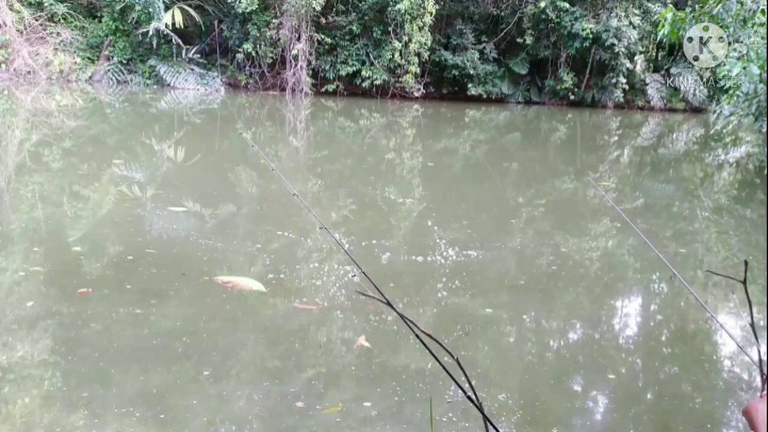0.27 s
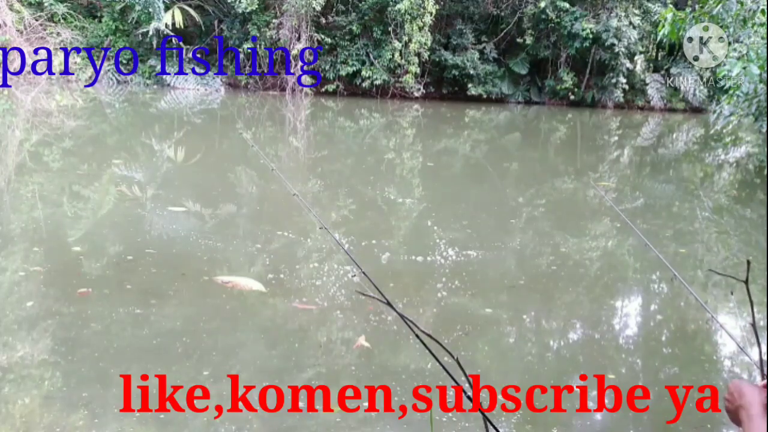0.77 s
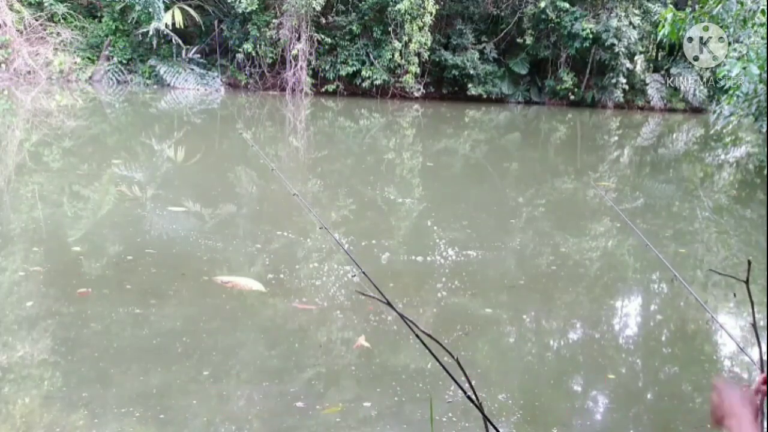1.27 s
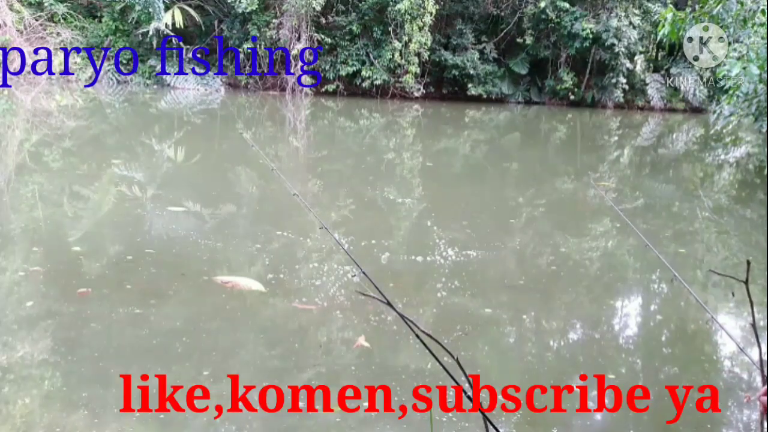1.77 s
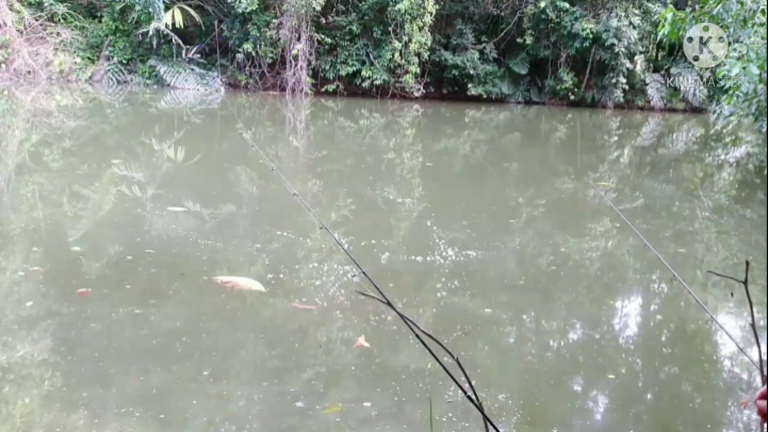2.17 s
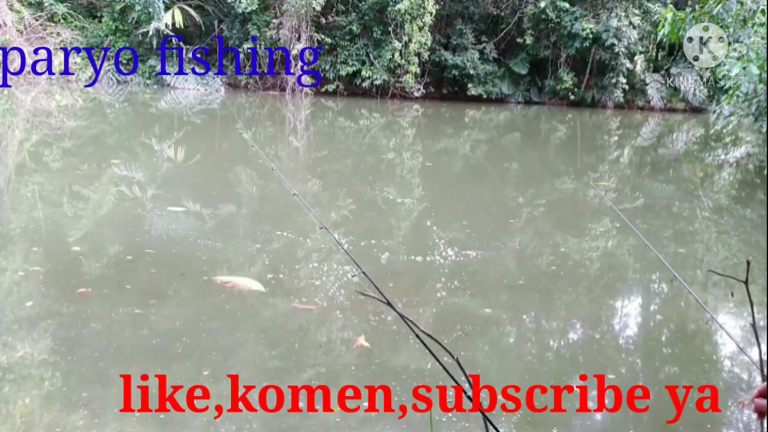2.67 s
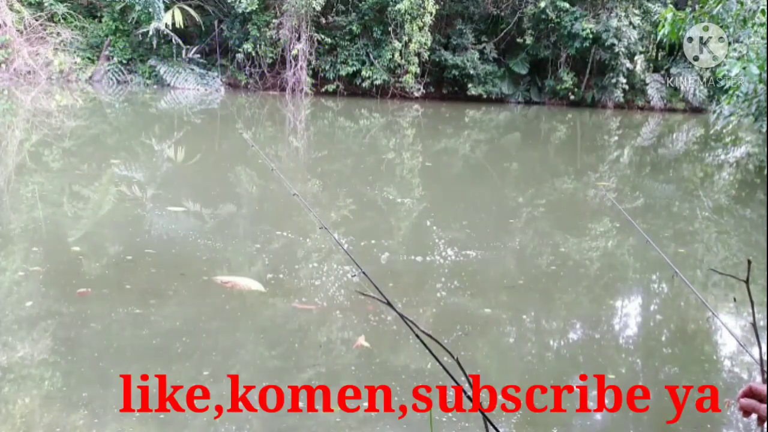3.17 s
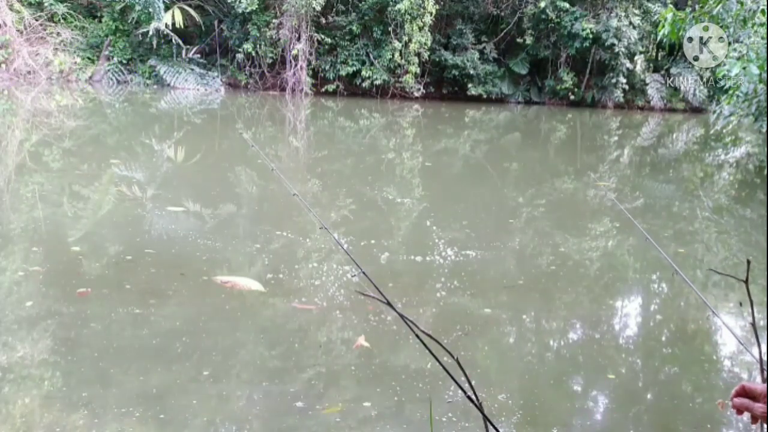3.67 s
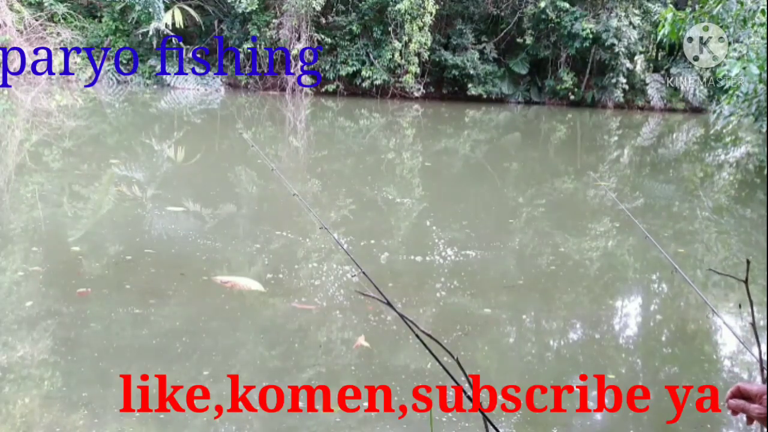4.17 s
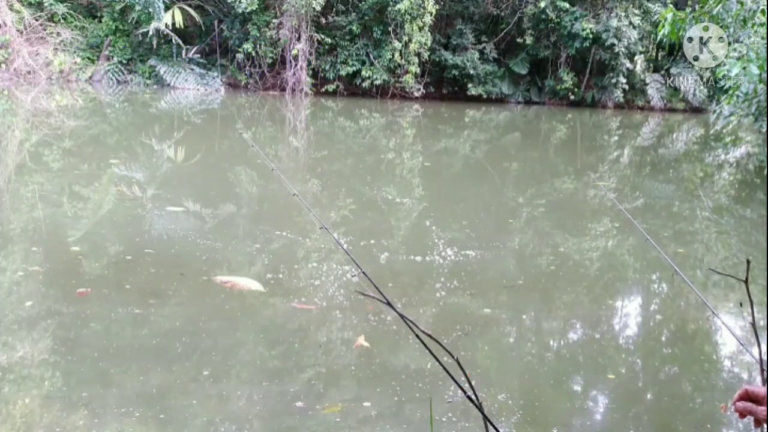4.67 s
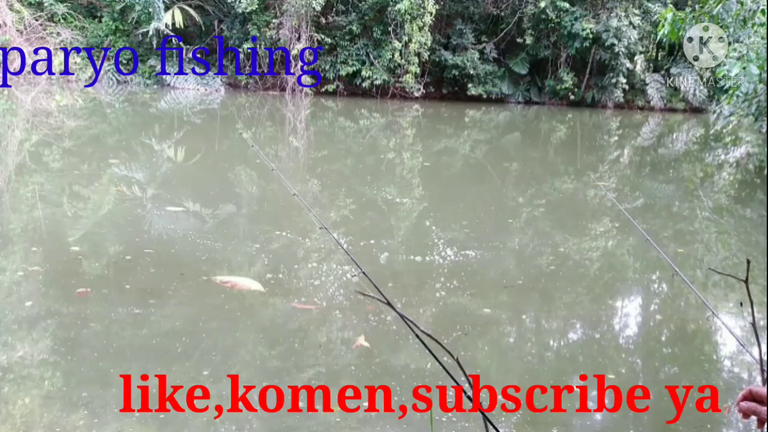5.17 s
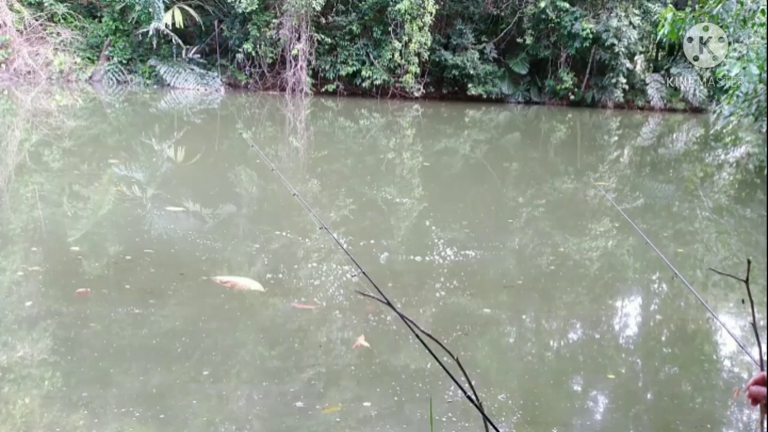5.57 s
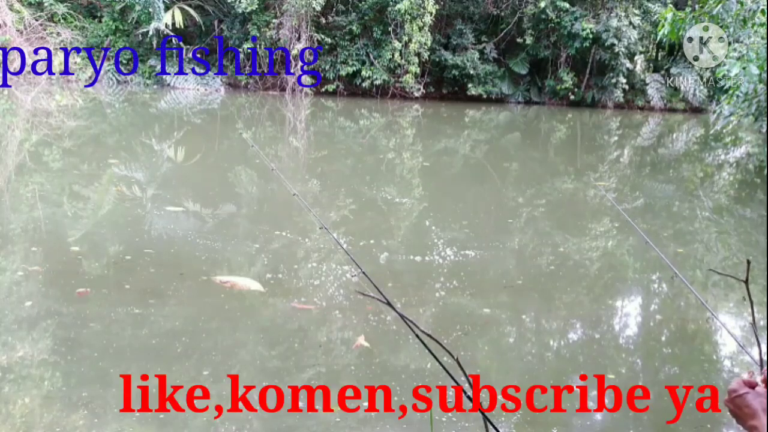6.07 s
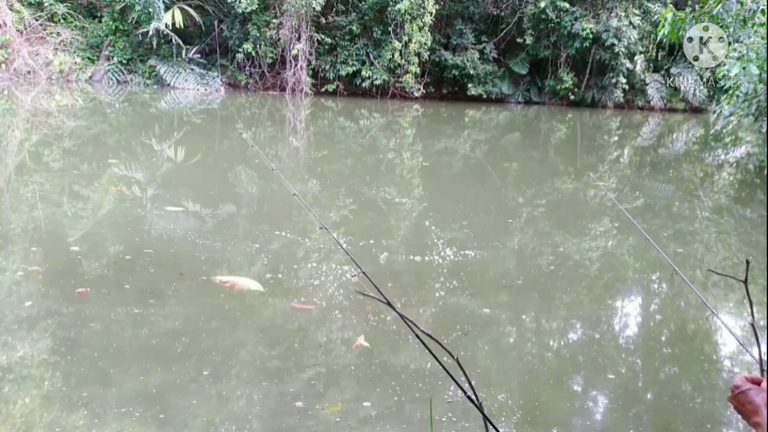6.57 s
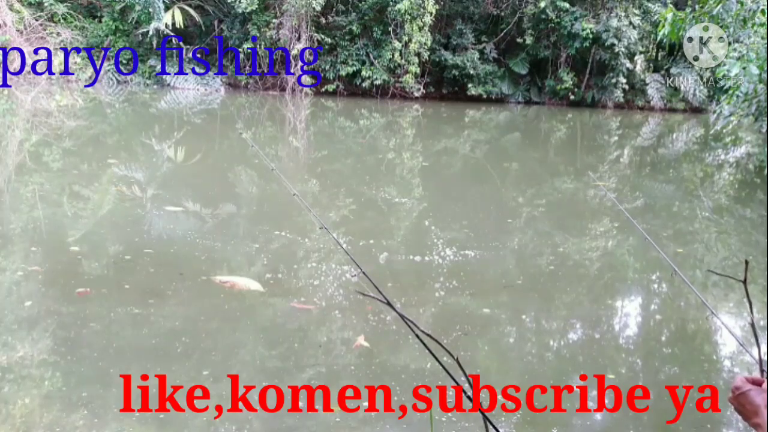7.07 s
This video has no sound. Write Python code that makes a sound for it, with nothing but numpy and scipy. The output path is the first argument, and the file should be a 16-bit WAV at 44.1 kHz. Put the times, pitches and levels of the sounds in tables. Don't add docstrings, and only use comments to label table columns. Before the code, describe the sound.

A steady, shrill cicada buzz, centred very high and spread to both sides, lasts throughout over faint leaf hiss and a distant, barely audible wavering hum. Light wind presses softly on the microphones, lowest in pitch and strongest near 0.9 s. Small cloth rustles open the scene; at 0.78 s a hollow cane is cracked hard in a quick double blow, rattling woodily, with a lighter knock at 0.88 s. At 1.4 s a brisk crisp sweep through grass stands out, then uneven close rustling continues to about 5 s, strongest around 1.6, 2.6, 3.4 and 4.3 s. A soft dull foot thud falls at 4.7 s. A small bird gives brief, rising-and-falling high whistles, faint at 1.4 s, then clearer at 2.4, 2.75, 3.3, 4.6 and 4.75 s, weaker around 5.5 and 6.4 s. The end is calmer, with insects, air and a slight rustle at 7.1 s.

```python
import sys
import numpy as np
from scipy import signal
from scipy.fft import rfft, irfft
from scipy.io import wavfile
from scipy.ndimage import uniform_filter1d

SR = 44100
rng = np.random.default_rng(int(sys.argv[2]) if len(sys.argv) > 2 else 0)


def materialize(psi):
    bounded = np.clip(np.atleast_2d(psi).T, -1, 1)
    quanta = np.round(bounded * 32767).astype(np.int16)
    wavfile.write(sys.argv[1], SR, quanta)


def magnitude_from_level(level_db):
    exponent = np.asarray(level_db, float) / 20
    return 10 ** exponent


N = 321930
TIME = np.arange(N) / SR
HZ = np.maximum(np.fft.rfftfreq(N, 1 / SR), 1)
EARS = np.array([[1], [-1]])


def unit(x):
    return x / np.sqrt(np.mean(x ** 2))


def along(points):
    hz, value = np.transpose(points)
    return np.interp(np.log(HZ), np.log(hz), value)


def contour(points):
    return np.interp(TIME, *np.transpose(points))


def colour(x, gain):
    return irfft(rfft(x) * gain, N)


def ring(x, hz, width_hz):
    return signal.lfilter(*signal.iirpeak(hz, hz / width_hz, fs=SR), x)


def walk(rate):
    k = int(SR / rate)
    held = np.repeat(rng.standard_normal(N // k + 1), k)
    return unit(uniform_filter1d(uniform_filter1d(held, k), k)[:N])


def arrival(lag_s):
    return np.exp(-1j * np.pi * HZ * lag_s * EARS)


def place(x, lag_s, t60, wet_db):
    t = TIME[:SR // 2]
    tail = rng.standard_normal((2, len(t))) * np.exp(-np.log(1000) * t / t60)
    tail *= magnitude_from_level(wet_db) / np.sqrt(np.sum(tail ** 2, axis=1, keepdims=True))
    scatter = signal.fftconvolve(np.atleast_2d(x), tail, axes=1)[:, :N]
    return colour(x, arrival(lag_s)) + scatter


# f/Hz, width/Hz, click rate/Hz, level/dB, left minus right/dB
CHOIRS = [(7110, 42, 190, -69, -10), (7500, 320, 160, -63, 7.5), (8170, 900, 260, -61.5, 9.5),
          (9327, 800, 300, -53.5, -3), (10200, 970, 310, -67.5, -9), (15200, 900, 270, -75, 7)]
# t/s, level/dB
SWELL = [
    (0.0, 0),
    (7.3, -1),
]


def cicadas():
    out, singers = 0, 32
    for hz, width_hz, rate, level_db, pan_db in CHOIRS:
        clicks = np.zeros((2, N))
        chance = rng.standard_normal((2, singers, 3500))
        tempo = rate * (1 + .08 * rng.standard_normal((singers, 1)))
        at = (np.cumsum(1 + .15 * chance[0], axis=1) * SR / tempo).astype(int) - SR // 10
        port = np.arange(singers)[:, None] % 2 + 0 * at
        heard = (at >= 0) & (at < N)
        strength = np.sign(chance[1]) * magnitude_from_level(2 * chance[1])
        np.add.at(clicks, (port[heard], at[heard]), strength[heard])
        buzz = ring(ring(clicks, hz, 1.5 * width_hz), hz, 1.5 * width_hz)
        buzz = buzz * magnitude_from_level(0.6 * walk(6))
        out = out + unit(buzz) * magnitude_from_level(level_db + EARS * pan_db / 2)
    return out * magnitude_from_level(contour(SWELL))


# f/Hz, level/dB per Hz
AIR = [(60, -87.5), (200, -89), (500, -95.5), (1100, -99), (1600, -95), (2400, -89), (3600, -92.5),
       (5500, -96.5), (6700, -95.5), (9000, -94.5), (11000, -99), (12600, -104), (14000, -104),
       (15500, -103)]
# f/Hz, share/0-1
ALIKE = [(60, 0.56), (300, 0.41), (900, 1), (1800, 0.02), (4000, 0.1), (15000, 0)]


def air():
    share = np.clip(along(ALIKE), 0, 1)
    common = rfft(rng.standard_normal(N)) * np.sqrt(share) * arrival(0.00027)
    apart = rfft(rng.standard_normal((2, N))) * np.sqrt(1 - share)
    hiss = (common + apart) * magnitude_from_level(along(AIR)) * np.sqrt(SR / 2)
    step = np.clip(1.5 * np.log2(HZ / 400), 0, 8)
    out = 0
    for k in range(9):
        band = irfft(hiss * np.clip(1 - abs(step - k), 0, 1), N)
        steadiness = 1 - 0.65 * (k > 7)
        out = out + band * magnitude_from_level(1.4 * walk(9) * steadiness)
    return out


def drone():
    hz = 429 + 7 * walk(11)
    hum = np.sin(2 * np.pi * np.cumsum(hz) / SR) * magnitude_from_level(4 * walk(9.9))
    skirt = unit(ring(rng.standard_normal(N), 418, 63))
    return place(magnitude_from_level(-72.5) * hum + magnitude_from_level(-68.5) * skirt, lag_s=0.00026, t60=0.22, wet_db=-8)


# f/Hz, level/dB per Hz
WIND = [(3, -59), (8, -57), (20, -66.5), (45, -75), (100, -81.5), (200, -93), (400, -100), (1000, -120)]
# t/s, level/dB
BREEZE = [
    (0, -2),
    (.9, 2),
    (1.6, -1),
    (4.6, .5),
    (7.3, 0),
]


def wind():
    gust_db = contour(BREEZE) + np.array([walk(2.96), walk(2.86)])
    gusts = rng.standard_normal((2, N)) * magnitude_from_level(gust_db)
    tilt_db = -4.0 * EARS / 2 * np.clip(1.3 - np.log10(HZ) / 2, 0, 1)
    return colour(gusts, magnitude_from_level(along(WIND) + tilt_db) * np.sqrt(SR / 2))


def bump(s, rise_s, hold_s, fall_s):
    before = np.maximum(s - TIME, 0) / rise_s
    after = np.maximum(TIME - s - hold_s, 0) / fall_s
    return magnitude_from_level(-10 * (before + after))


# peak t/s, effort level/dB, 10 dB fade t/s, dull rubbing under crisp level/dB
STIRS = [(.2, -62, .14, -10), (.97, -62, .12, -3), (1.6, -53, .2, -10), (1.77, -58, .12, -7),
         (1.86, -58, .1, -9), (2.13, -60, .3, -5), (2.3, -63, .2, -6), (2.63, -56, .2, -5.5),
         (2.75, -62, .1, -8), (2.93, -59.5, .07, -12), (3.25, -58.5, .13, -9), (3.42, -54.5, .1, -12),
         (3.55, -63, .2, -7), (3.75, -57.5, .12, -3), (3.95, -65, .2, -12), (4.26, -57, .1, -1),
         (4.31, -54, .07, -2), (4.57, -65, .12, -8), (4.77, -61, .12, -8), (4.848, -62, .04, -8),
         (5.05, -62, .4, -6), (5.6, -63.5, .3, -10), (5.8, -63, .13, -9), (7.13, -64.5, .2, -7)]


def movement():
    moves = []
    for s, db, fade_s, weight_db in STIRS:
        moves.append((bump(s, .8 * fade_s, 0, fade_s) * magnitude_from_level(db), weight_db))
    sweep = bump(1.411, rise_s=.009, hold_s=.12, fall_s=.08)
    moves.append((sweep * magnitude_from_level(-47.5), -3))
    moves.append((magnitude_from_level(-72), -6))
    crisp_power = sum(g ** 2 for g, _ in moves)
    dull_power = sum((g * magnitude_from_level(db)) ** 2 for g, db in moves)
    return np.sqrt(crisp_power), np.sqrt(dull_power)


# f/Hz, level/dB per Hz
CRISP = [(700, -12), (1500, -3.5), (2500, 4.5), (5000, 1), (6500, -3), (9000, -3.5), (11000, -9.5),
         (13700, -15.5), (14600, -13), (15500, -13)]
# f/Hz, level/dB per Hz
DULL = [(80, -33), (200, 3), (400, 2.5), (700, -1), (1100, -8), (1600, -20.5), (3000, -46)]


def rustle():
    effort, weight = movement()
    grains = rng.standard_normal((3, N)) * magnitude_from_level(1.7 * rng.exponential(size=N)) * magnitude_from_level(1.43 * walk(70))
    crisp = unit(colour(grains, magnitude_from_level(along(CRISP)))) * magnitude_from_level(3)
    sheen = colour(crisp, np.clip(HZ / 1500 - 4, 0, 1))
    crisp += sheen * (np.sqrt(effort * magnitude_from_level(42)) - 1)
    rub = rng.standard_normal((3, N)) * magnitude_from_level(1.3 * walk(25))
    dull = unit(colour(rub, magnitude_from_level(along(DULL)))) * weight / effort
    shared = colour((crisp[0] + dull[0]) * effort, arrival(-0.000236))
    alone = (magnitude_from_level(-2.5) * crisp[1:] + magnitude_from_level(-4) * dull[1:]) * effort
    return magnitude_from_level(-1.5) * shared + alone


# t/s, crack level/dB, rattle level/dB, hardness/dB per octave
KNOCKS = [
    (0.7787, -29, -33, -3),
    (0.7838, -26, -27, -2.5),
    (0.808, -60, -29.5, -5),
    (.876, -36, -31.5, -3),
    (0.897, -60, -38, -3),
]
# f/Hz, width/Hz, level/dB
CANE = [(270, 60, -6), (396, 24, 2), (580, 110, 1), (830, 200, 0), (1039, 60, 3), (1330, 250, -3),
        (1750, 350, 0), (2250, 400, 1), (3050, 500, -5), (4200, 900, -14)]


def cane():
    out = np.zeros(N)
    t, lead = TIME[:SR // 4], 1e-3
    crack = -np.cos(2 * np.pi * 2200 * (t - lead)) * np.exp(-((t - lead) / 2.6e-4) ** 2)
    for s, crack_db, rattle_db, hard_db in KNOCKS:
        rattle = rng.standard_normal(len(t)) * np.exp(-t / 0.023) * (1 - np.exp(-t / 0.0019))
        body = 0
        for hz, width_hz, db in CANE:
            body = body + magnitude_from_level(db + hard_db * np.log2(hz / 400)) * ring(rattle, hz, width_hz)
        start = int((s - lead) * SR)
        out[start:][:len(t)] += magnitude_from_level(crack_db) * crack + magnitude_from_level(rattle_db) * body
    out = colour(out, 1 / (1 + (HZ / 3800) ** 4))
    return place(out, lag_s=-2.6e-4, t60=.09, wet_db=-4)


# top t/s, top f/Hz, level/dB, left minus right/dB
NOTES = [(1.395, 7700, -59, 0), (2.403, 7550, -51, 2), (2.752, 7550, -50, 2), (3.317, 7550, -47, 0),
         (4.582, 7430, -48, 0), (4.762, 7500, -48, 0), (5.455, 7400, -52.5, 3), (5.63, 7250, -53, 3),
         (6.31, 7340, -54, 0), (6.485, 7300, -55.5, -3), (5.25, 6300, -61, 0)]


def bird():
    out, t = np.zeros((2, N)), TIME[:SR // 5] - .1
    arch_hz, rise_s, fall_s = 1458, .03, .031
    u = np.clip(t / np.where(t < 0, rise_s, fall_s), -1, 1)
    for s, top_hz, level_db, pan_db in NOTES:
        tone = np.sin(2 * np.pi * np.cumsum(top_hz - arch_hz * abs(u) ** 2) / SR)
        tone *= (1 - u ** 2) ** .4 * magnitude_from_level(-1.5 * u)
        tone *= 1 + .45 * unit(uniform_filter1d(rng.standard_normal(len(t)), size=90))
        start = int((s + t[0]) * SR)
        out[:, start:][:, :len(t)] += tone * magnitude_from_level(level_db + EARS * pan_db / 2)
    near = place(out, lag_s=1e-4, t60=.09, wet_db=-1)
    return place(near, lag_s=0, t60=.4, wet_db=-5)


# t/s, f/Hz, level/dB, decay t/s
THUD = [
    (4.70, 272, -45, 0.02),
    (4.70, 452, -50, 0.023),
]


def thud():
    out = 0
    for s, hz, db, decay_s in THUD:
        t = np.maximum(TIME - s, 0)
        envelope = t / decay_s * np.exp(1 - t / decay_s * 2)
        out = out + magnitude_from_level(db) * np.sin(2 * np.pi * hz * t) * envelope
    return place(out, lag_s=-1e-4, t60=0.07, wet_db=-3)


# f/Hz, width/Hz, level/dB
PORTS = [(9100, 2700, 9.5), (9260, 3800, 7.5)]


def port_cavities(close):
    out = []
    for ear, (hz, width_hz, db) in zip(close, PORTS):
        out.append(ear + magnitude_from_level(db) * ring(ear, hz, width_hz))
    return np.array(out)


def scene():
    close = port_cavities(rustle() + cane() + thud())
    return close + cicadas() + air() + drone() + bird() + wind()


def top_cut(x):
    return signal.sosfilt(signal.butter(12, 15560, fs=SR, output="sos"), x)


def record(dry):
    return top_cut(dry)


dry = scene()
out = record(dry)
materialize(out)
```